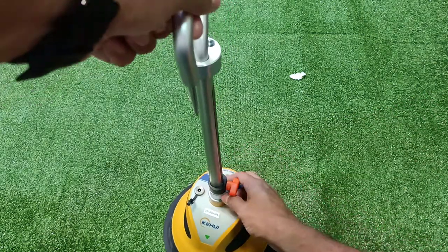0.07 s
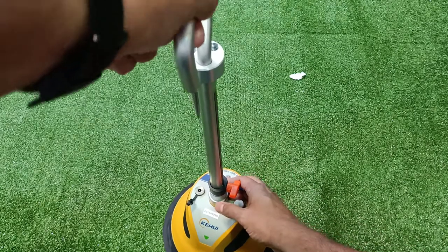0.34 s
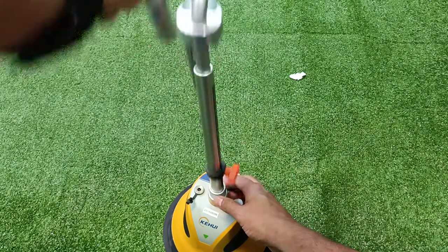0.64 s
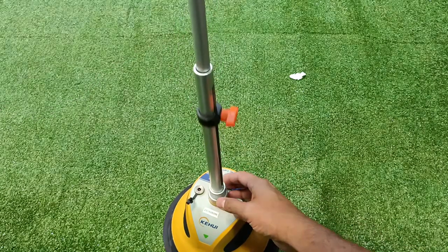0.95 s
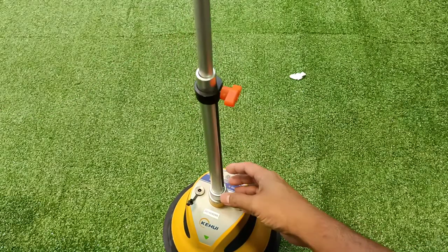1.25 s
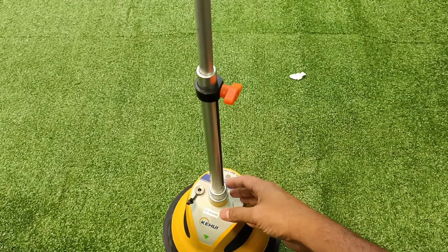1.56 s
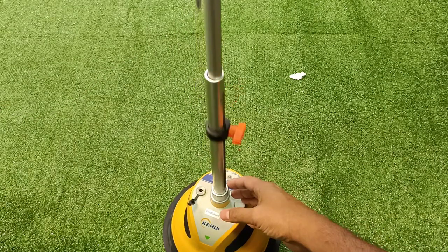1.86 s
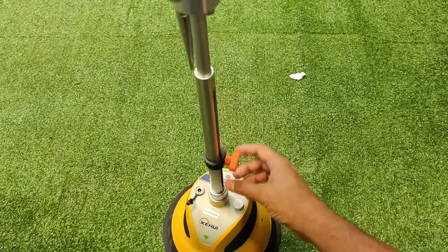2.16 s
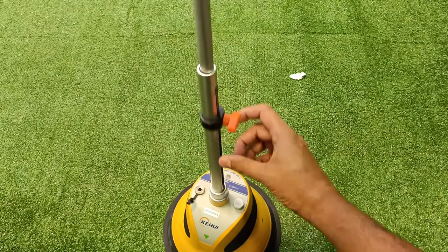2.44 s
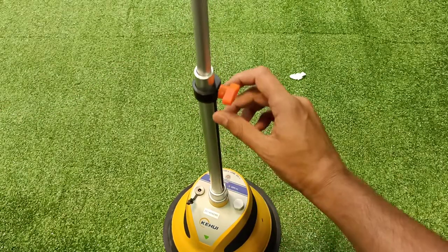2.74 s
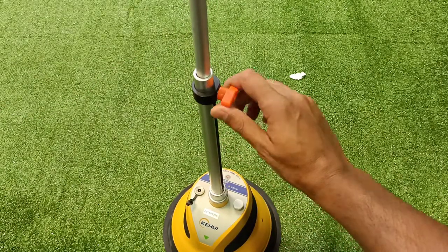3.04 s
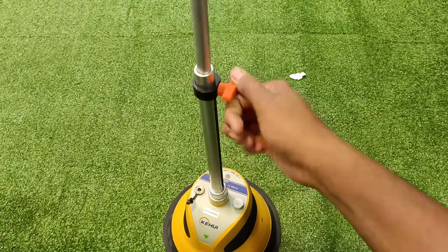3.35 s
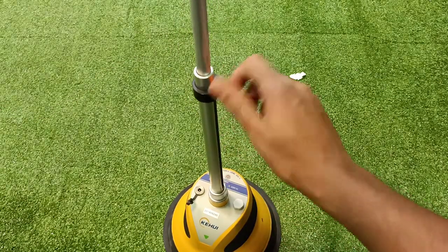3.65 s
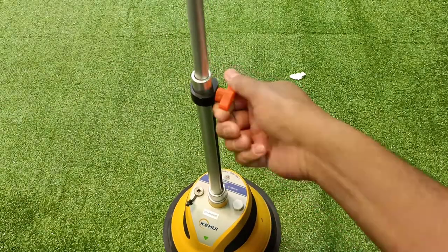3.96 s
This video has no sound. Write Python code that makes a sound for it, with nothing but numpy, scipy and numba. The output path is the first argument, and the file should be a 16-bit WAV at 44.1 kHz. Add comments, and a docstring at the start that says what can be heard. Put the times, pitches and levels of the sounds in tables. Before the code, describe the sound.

A telescopic metal pole clicks at the start and clatters at about 0.5 seconds. Its tubes scrape out until 1.2 seconds, ringing lightly and rumbling the heavy base, slide back in from 1.6, then out again from 2.2. They hit the stop with a loud clank and thud at 2.7. From 3.1 to 3.9 a plastic clamp knob ticks faintly. The background is quiet, with a short echo.

```python
"""A telescopic metal pole on a heavy base is pulled up, pushed down and pulled up again until it hits its stop.
Tiny slips between the tubes ring the metal and rumble the base; knocks ring the same parts.
Then a plastic clamp knob is turned with small ticks. Nearby walls add a short echo over a quiet background."""
import sys
import numpy as np
from scipy import signal
from scipy.fft import rfft, irfft
from scipy.io import wavfile
from scipy.ndimage import uniform_filter1d
from numba import njit

SR = 44100
rng = np.random.default_rng(int(sys.argv[2]) if len(sys.argv) > 2 else 0)


def transcribe(signal):
    """Save signal, clipped to [-1, 1], as a 16-bit WAV file at the path in sys.argv[1]."""
    frames = np.atleast_2d(signal).T
    limited = np.clip(frames, -1, 1)
    pcm = np.round(limited * 32767).astype(np.int16)
    wavfile.write(sys.argv[1], SR, pcm)


N = 176400

# ringing of the tubes (Hz, dB of the clean mode, t60 s, dB of its crowd of neighbours)
TUBE_MODES = [(1290, -33, .3, -21), (2260, -30, .3, -22), (2594, -26, .25, -22), (2833, -26, .35, -22), (4865, -26, .45, -18), (5230, -26, .35, -18), (5995, -17, .5, -17), (6456, -13, .62, -17), (6745, -23, .4, -19), (7880, -22, .35, -16), (9604, -25, .35, -20), (11200, -27, .3, -16), (11560, -22, .4, -16), (12030, -20, .35, -17), (13460, -25, .2, -17), (13840, -20, .28, -16)]  # fixed
# ringing of the base, shaken through the pole (Hz, dB, t60 s)
BASE_MODES = [(149, -3, .33), (172, -8, .2), (204, -5, .4), (248, -5, .28), (298, -1, .34), (385, -11, .28), (447, -12, .25), (535, -10, .26), (630, -18, .25)]  # fixed
# one table for each stroke (s, scrape level dB, level of the treble against it dB)
FIRST_PULL = [(.58, -57, -1), (.605, -45, -4), (.63, -41, -5), (.68, -44, -5), (.76, -44, 0), (.87, -46.5, 2), (.97, -48, 0), (1.02, -54, -1), (1.07, -51, -3), (1.12, -54, -4), (1.19, -52.5, -8), (1.25, -70, -9)]  # fixed
PUSH = [(1.62, -82, 0), (1.68, -59, 1), (1.74, -47, 1.5), (1.79, -42, .5), (1.9, -42.5, 1.5), (2.0, -45.5, -2), (2.08, -50, -7), (2.16, -66, -8)]  # fixed
SECOND_PULL = [(2.16, -66, -6), (2.21, -56, -9), (2.3, -49.5, -1), (2.4, -46, 0), (2.5, -48.5, -2), (2.58, -54, -1), (2.66, -60, -3), (2.7, -59, -4)]  # fixed
# colour of the scrape in each direction (Hz, dB per Hz)
PULL_COLOUR = [(300, -5), (750, -19.5), (1200, -2), (1700, -11.5), (2400, 0), (3100, -6), (3800, -3.5), (5500, -6.5), (7200, -7), (8600, -15.5), (10600, -25), (13500, -20), (15600, -10)]
PUSH_COLOUR = [(300, -22), (800, -9), (1300, -4), (1800, -7), (2500, -2), (3400, 5.5), (4400, -2), (5600, -6), (6900, 0.5), (8200, -10.5), (9000, -10.5), (10600, -22.5), (11400, -21), (15600, -13)]
# the resonance that the contact excites most as it travels (s, Hz, dB)
CONTACT = [(.62, 3080, 10), (.8, 2440, -5.5), (1.05, 2890, 6), (1.2, 2220, -13.5), (1.7, 3150, 0), (1.82, 3240, -0.5), (1.899, 1800, 3), (2.03, 1810, 16.5), (2.1, 2350, 13), (2.2, 3460, 11), (2.5, 3020, 6.5), (2.7, 2600, 3)]
CONTACT_WIDTH_HZ, TREBLE_HZ, TREBLE_DB, SCRAPE_DB, SCRAPE_RING_DB = 210, 4180, 0, -2, 0
SLIPS_PER_S, SLIP_SPREAD_DB, GRIP_DB, GRIP_PER_S = 9000, 2.5, .9, 55  # fixed
# shudder of the sliding tube (s, level dB, pitch Hz rising with speed)
SHUDDER = [(.55, -57.5, 433), (.68, -55.5, 477), (.76, -74, 467), (.9, -74, 493), (.94, -50.5, 537), (1.03, -60.5, 453), (1.08, -49, 320), (1.191, -44, 232), (1.27, -114, 195),
           (1.36, -99, 183), (1.55, -70, 185), (1.59, -57, 208), (1.65, -48, 203), (1.72, -47, 227), (1.801, -47.5, 246), (1.87, -57.5, 515), (2.0, -58.5, 513), (2.3, -61.5, 547), (2.55, -59.5, 298), (2.7, -60.5, 269)]
SHUDDER_WIDTH_HZ, SHUDDER_BASE_DB, SHUDDER_DB = 137, -1.5, -8
# knocks of metal on metal (s, clack dB, centre of the clack Hz, clean ring dB, tilt dB per octave)
KNOCKS = [(.0512, -8, 6560, 6, -1.5), (.059, -16, 2470, 4, -1.5), (0.453, -21.5, 6500, 20, -6), (.461, -15, 2500, 18, 2), (0.467, -11.5, 3000, -24, -4.5), (.4705, -5, 3700, 7, -1), (.478, -3.5, 3520, 4, -2.5), (.4858, 2, 3740, -31.5, 0.5), (.489, -8.5, 6700, -27, -0.5),
          (.508, -14, 4050, 10, -4), (1.214, -19.5, 2480, -32.5, -5), (2.7012, -6, 6300, 6.5, -2), (2.7055, -4, 3840, 5, -6), (2.711, -8, 2430, -40, 13), (2.725, -7.5, 6000, -2, -2.5)]
CLACK_COLOUR = [(70, -51), (220, -18), (500, -1.5), (850, -16), (1500, -7.5), (2500, 2), (4000, 5.5), (5400, -0.5), (7000, 6), (8800, -6.5), (10800, -15), (13000, -10.5), (15500, -15)]
CLACK_WIDTH_HZ, CLACK_FOCUS_DB = 300, -5
# thuds through the base (s, dB, pitch of the first bump Hz, ring of the base dB)
THUDS = [(0.054, -28, 490, 5), (0.459, -7.5, 212, 10), (.485, -12.5, 489, -10), (0.492, -4, 144, -4.5), (0.694, -18, 433, -6), (.915, -16, 300, -2.5), (1.193, -16, 164, -0.5), (1.572, -20.5, 204, -12), (2.7006, 5, 196, -4)]
# ticks of the knob and fingers (s, tick dB, thud dB)
TICKS = [(0.021, -28.5, -34), (0.269, -36.5, -35.5), (0.397, -35.5, -33.5), (3.1115, -31, -33), (3.1765, -33, -28), (3.19, -31.5, -29), (3.2241, -27, -26), (3.317, -33, -29), (3.3427, -28.5, -36),
         (3.404, -71, -36), (3.6651, -33, -26.5), (3.6936, -31.5, -31.5), (3.7117, -23.5, -51), (3.74, -40, -28), (3.869, -36.5, -33), (3.906, -40, -33)]
TICK_COLOUR = [(300, -5.5), (900, -11), (1700, -4), (2300, 4.5), (3300, 1), (5000, -7.5), (6600, 2), (9000, -18.5), (15500, -16.5)]
TICK_SOFT_HZ, TICK_RING_DB = 400, -4
DENSE_T60_S, DENSE_DB, CRACK_T60_S, CROWD_WIDTH_HZ, CROWD_T60_S = 0.49, -10.5, 0.064, 150, 0.33
ECHO_T60_S, ECHO_DB, ECHO_DELAY_S = 0.41, -9, 0.014
AIR = [(13, -30), (22, -4), (105, -10), (209, -15), (342, -20.5), (382, -21.5), (489, -26.5), (2470, -33.5), (2680, -28.5),
       (4760, -38), (7390, -38.5), (15500, -46)]  # (Hz, dB per Hz)
AIR_DB = -69
TOP_HZ = 15800  # fixed
T = np.arange(N) / SR
RING_T = T[:SR]
# how far the pole is drawn out (s, share 0-1); the free tube rings more
EXTENSION = [(.58, 0), (1.0, 0.95), (1.25, 0.59), (1.6, 0.43), (2.15, 0.38), (2.5, 1), (2.7, 0.98)]
EXTENDED_RING_DB = 4
BUMP_T60_S, BUMP_RISE_S, BASE_LOWEST_HZ = 0.043, 0.004, 135
SQUEALS_PER_S = None
SQUEAL_LOW_HZ = None
SQUEAL_HIGH_HZ = None
SQUEAL_S = None
SQUEAL_DB = None
SQUEAL_BEND = None
CLEAN_DB, CROWD_DB, HAND_DAMPING = -6, -2.5, .75  # fixed
TICK_T60_S, TICK_TAIL_T60_S, TICK_TAIL_DB = 0.045, 0.36, -0.5
KNOB_HZ, KNOB_T60_S, KNOB_DB = 2270, 0.11, -16.5
# resonances that come and go as the tubes overlap more or less: width, wander of level and pitch, pace
SHIFT_WIDTH_HZ, SHIFT_SPREAD_DB, SHIFT_DRIFT_HZ, SHIFT_PER_S, SHIFT_DB = 170, 4, 130, 11, 0  # fixed


def amp(db):
    """Decibels to gain."""
    return 10 ** (np.asarray(db) / 20)


def unit(x):
    """Scale to unit energy."""
    return x / np.sqrt(np.sum(x ** 2))


def steady(x):
    """Scale to rms 1."""
    return x / np.std(x)


def fade(t60):
    """Exponential decay of a ring."""
    return np.exp(-np.log(1000) * RING_T / t60)


def tail(t60):
    """Countless overlapping modes: dying noise of unit energy."""
    return unit(rng.standard_normal(SR) * fade(t60))


def through(x, response):
    """Play a signal through an impulse response."""
    return signal.fftconvolve(x, response)[:len(x)]


def band(x, hz, width_hz):
    """Resonance with gain 1 at its centre."""
    return signal.lfilter(*signal.iirpeak(min(hz, SR / 2 - 1), hz / width_hz, fs=SR), x)


def low(x, hz, order=2):
    """Low-pass."""
    return signal.sosfilt(signal.butter(order, hz, fs=SR, output="sos"), x)


def colour(points, tilt_db=0, size=4096):
    """Causal response with the given spectrum, tilted about the middle treble."""
    hz, db = np.array(points).T
    octave = np.log2(np.maximum(np.fft.rfftfreq(size, 1 / SR), 1))
    gain = amp(np.interp(octave, np.log2(hz), db) + tilt_db * np.maximum(octave - np.log2(TREBLE_HZ), -2))
    cepstrum = irfft(np.log(gain))
    cepstrum[1:size // 2] *= 2
    cepstrum[size // 2 + 1:] = 0
    return irfft(np.exp(rfft(cepstrum)))


@njit
def sweep(x, hz, width):
    """Band-pass with a moving centre."""
    y, b, l = np.empty(len(x)), 0., 0.
    for i in range(len(x)):
        g, k = np.tan(np.pi * hz[i] / SR), width / hz[i]
        v = (b + g * (x[i] - l)) / (1 + g * (g + k))
        b, l, y[i] = 2 * v - b, l + 2 * g * v, k * v
    return y


def walk(rate):
    """Smooth random wander with a spread near 1."""
    return np.interp(T * rate, np.arange(SR // 10), rng.standard_normal(SR // 10))


def level(times, db):
    """Gain along a level curve, silent outside it."""
    return uniform_filter1d(amp(np.interp(T, times, db)) * (T > times[0]) * (T < times[-1]), SR // 100)


def add(out, start, sound):
    """Mix a sound in at a time."""
    i = int(start * SR)
    out[i:i + len(sound)] += sound[:N - i]


def tube():
    """The tubes' answer to a tap: clean modes, each with a crowd of short-lived neighbours."""
    ring = 0
    for hz, db, t60, crowd_db in TUBE_MODES:
        clean = np.cos(2 * np.pi * hz * RING_T) * fade(t60 * HAND_DAMPING)
        crowd = band(band(tail(CROWD_T60_S), hz, CROWD_WIDTH_HZ), hz, CROWD_WIDTH_HZ)
        ring = ring + amp(db + CLEAN_DB) * unit(clean) + amp(crowd_db + CROWD_DB) * unit(crowd)
    return ring


def base():
    """The low modes of the base, each starting at a chance phase."""
    modes = sum(amp(db) * np.sin(2 * np.pi * (hz * RING_T + rng.random())) * fade(t60) for hz, db, t60 in BASE_MODES)
    return unit(high(low(modes, 900), BASE_LOWEST_HZ))


def slips():
    """Dense tiny slips of uneven size, in bunches as the grip changes."""
    sizes = amp(SLIP_SPREAD_DB * np.minimum(rng.exponential(size=N), 4)) * rng.choice([-1, 1], N)
    return steady((rng.random(N) < SLIPS_PER_S / SR) * sizes * amp(GRIP_DB * walk(GRIP_PER_S)))


def scrape(stroke, spectrum, friction, ring):
    """One stroke: friction rings the tubes, brighter when fast, with a resonance that moves with the contact."""
    times, db, treble_db = np.array(stroke).T
    at, contact_hz, contact_db = np.array(CONTACT).T
    rub = through(friction, colour(spectrum))
    rub = rub + amp(np.interp(T, at, contact_db)) * sweep(rub, np.interp(T, at, contact_hz), float(CONTACT_WIDTH_HZ))
    rasp = low(low(rub, TREBLE_HZ, order=4)[::-1], TREBLE_HZ, order=4)[::-1]
    hiss = amp(TREBLE_DB + np.interp(T, times, treble_db)) * steady(rub - rasp)
    sliding = (steady(rasp) + hiss) * level(times, db + SCRAPE_DB)
    freedom = amp(SCRAPE_RING_DB + EXTENDED_RING_DB * np.interp(T, *np.array(EXTENSION).T))
    return sliding + through(freedom * sliding, ring)


def shudder():
    """The sliding tube shudders at a pitch that follows its speed and shakes the base."""
    times, db, hz = np.array(SHUDDER).T
    pitch, width, gain = np.interp(T, times, hz), float(SHUDDER_WIDTH_HZ), level(times, db + SHUDDER_DB)
    groan = steady(sweep(sweep(slips(), pitch, width), pitch, width))
    return gain * groan + amp(SHUDDER_BASE_DB) * through(gain * slips(), base())


def knocks(ring):
    """Metal knocks against metal with a crack and a dense wash; the heavier jolts thud through the base."""
    out = np.zeros(N)
    for start, db, hz, ring_db, tilt_db in KNOCKS:
        wash = unit(tail(CRACK_T60_S) + amp(DENSE_DB) * tail(DENSE_T60_S))
        clack = through(wash + amp(ring_db) * ring, colour(CLACK_COLOUR, tilt_db))
        add(out, start, amp(db) * unit(clack + amp(CLACK_FOCUS_DB) * band(clack, hz, CLACK_WIDTH_HZ)) / 2)
    for start, db, hz, ring_db in THUDS:
        bump = np.sin(2 * np.pi * hz * RING_T) * fade(BUMP_T60_S) * (1 - np.exp(-RING_T / BUMP_RISE_S))
        add(out, start, amp(db) * unit(unit(high(bump, BASE_LOWEST_HZ)) + amp(ring_db) * base()) / 2)
    return out


def knob(ring):
    """Short plastic ticks ring the knob, and faintly the tubes; the fingers bump softly."""
    out = np.zeros(N)
    plastic = amp(KNOB_DB) * unit(np.sin(2 * np.pi * KNOB_HZ * RING_T) * fade(KNOB_T60_S))
    for start, db, thud_db in TICKS:
        tick = tail(TICK_T60_S) + amp(TICK_TAIL_DB) * tail(TICK_TAIL_T60_S) + amp(TICK_RING_DB) * ring + plastic
        add(out, start, amp(db) * unit(through(tick, colour(TICK_COLOUR))) / 2)
        add(out, start, amp(thud_db) * unit(low(high(tail(0.2), BASE_LOWEST_HZ), TICK_SOFT_HZ)) / 2)
    return out


def high(x, hz):
    """Steep high-pass."""
    return signal.sosfilt(signal.butter(4, hz, "high", fs=SR, output="sos"), x)




def shifting(count=30):
    """Fresh noise heard through many narrow resonances that drift and swell on their own, to be added to the
    friction."""
    out = 0
    for centre in np.linspace(1700, 15300, count):  # fixed
        hz, width = centre + SHIFT_DRIFT_HZ * walk(SHIFT_PER_S / 2), float(SHIFT_WIDTH_HZ)
        out = out + amp(SHIFT_SPREAD_DB * walk(SHIFT_PER_S)) * sweep(sweep(rng.standard_normal(N), hz, width), hz, width)
    return steady(out)


def scene():
    """Strokes, knocks and knob with their echo, over the background."""
    ring, friction = tube(), slips() + amp(SHIFT_DB) * shifting()
    strokes = sum(scrape(stroke, spectrum, friction, tube()) for stroke, spectrum in [(FIRST_PULL, PULL_COLOUR), (PUSH, PUSH_COLOUR), (SECOND_PULL, PULL_COLOUR)])
    pole = strokes + shudder() + knocks(ring) + knob(ring)
    out = pole + amp(AIR_DB + 0.88 * walk(4)) * steady(through(rng.standard_normal(N), colour(AIR)))
    # the reflections change as the pole and the arm move
    turn = np.pi * np.interp(T, *np.array(EXTENSION).T)
    for share in (np.cos(turn), np.sin(turn)):
        add(out, ECHO_DELAY_S, amp(ECHO_DB) * through(share * pole, low(tail(ECHO_T60_S), 4700, order=1)))
    return out[None]


def record(dry):
    """The recorder cuts the top."""
    return signal.sosfilt(signal.ellip(10, .2, 70, TOP_HZ, fs=SR, output="sos"), dry)


dry = scene()
out = record(dry)
transcribe(out)
```